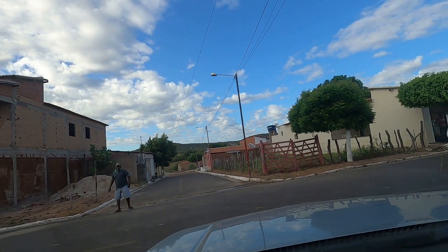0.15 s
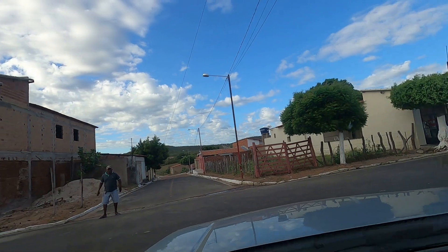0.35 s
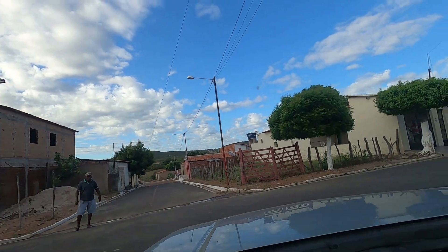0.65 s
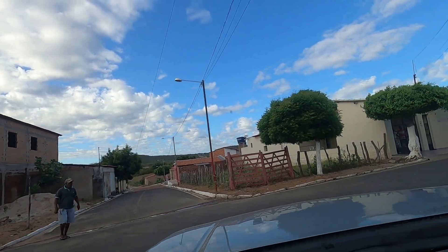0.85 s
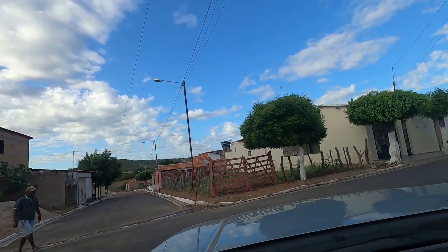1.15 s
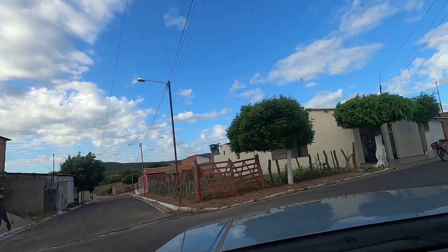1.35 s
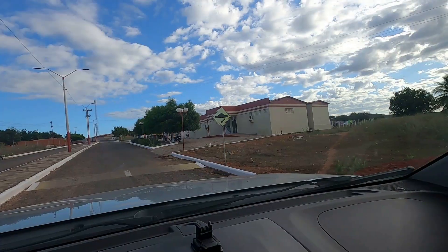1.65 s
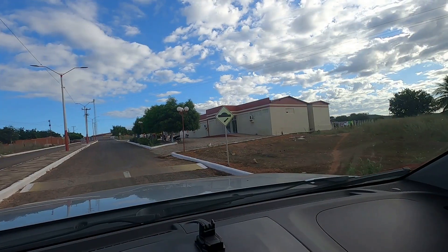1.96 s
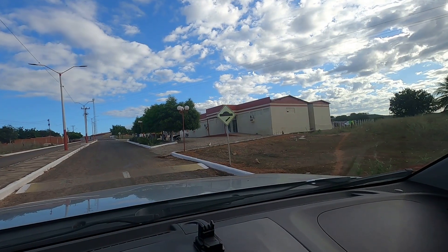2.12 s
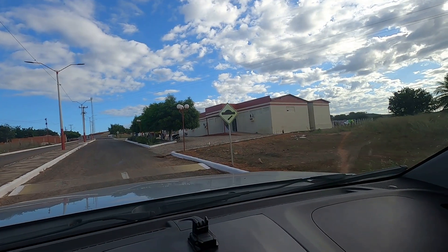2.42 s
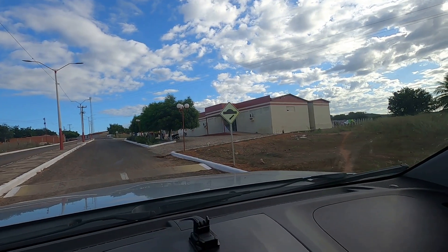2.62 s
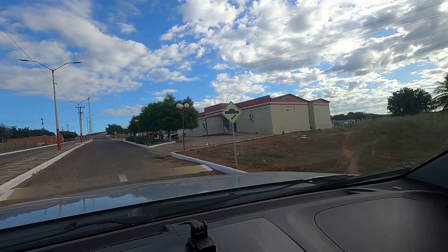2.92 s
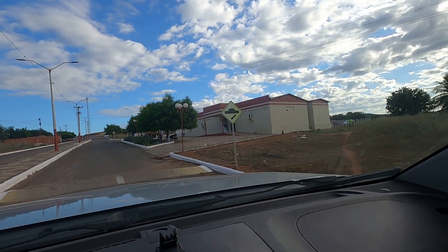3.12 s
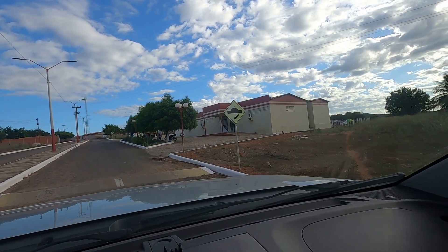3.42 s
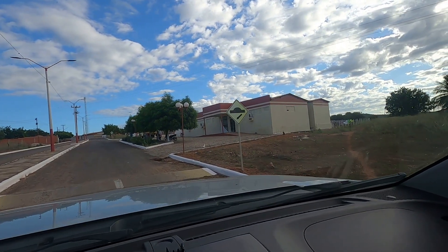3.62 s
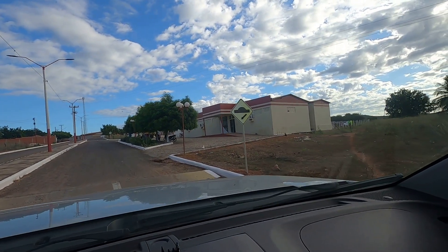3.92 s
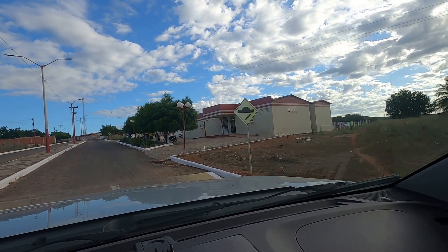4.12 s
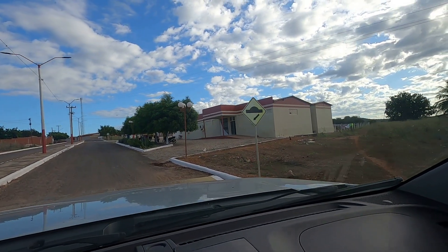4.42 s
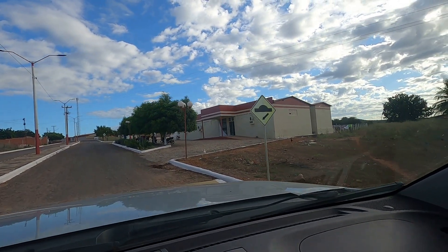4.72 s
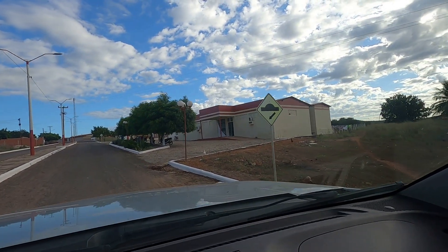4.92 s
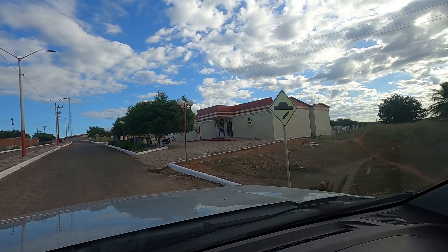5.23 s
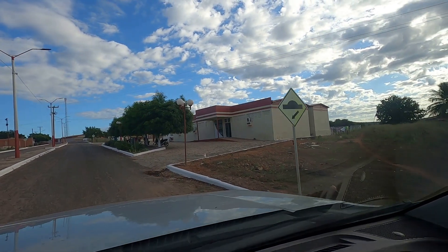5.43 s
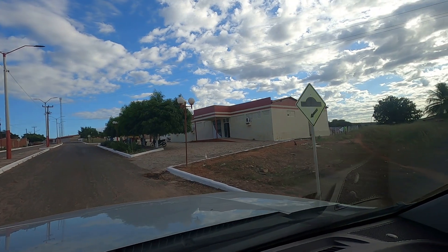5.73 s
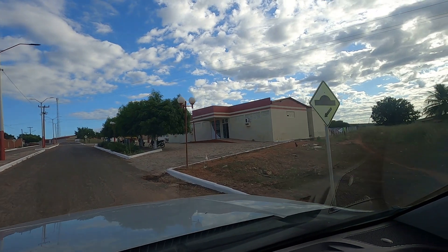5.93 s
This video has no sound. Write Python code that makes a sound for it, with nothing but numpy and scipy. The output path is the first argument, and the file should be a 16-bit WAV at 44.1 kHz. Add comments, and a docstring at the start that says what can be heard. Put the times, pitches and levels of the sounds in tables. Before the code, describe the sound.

Low-revving car engine and muffled tyre rumble heard from the cabin; loose trim clacks in a turn, sound cuts out, then driving resumes.

```python
"""First heard is a four-cylinder engine booming at low revs, from inside a car rolling slowly through town. The
tyres rumble through the body and drone in the panel resonances (filtered noise); in the turn a loose fitting
clicks and rattles (noise clacks and decaying modes), and road seams knock and ring. The sound of the turn
breaks off, a short silence follows, then the scene changes to a straight that fades in; late in it the road
noise changes colour and widens. The microphone is in the cabin, with two close ports, left and right."""
import sys
import numpy as np
from scipy import signal
from scipy.fft import rfft, irfft, next_fast_len
from scipy.io import wavfile

SR = 44100
rng = np.random.default_rng(int(sys.argv[2]) if len(sys.argv) > 2 else 0)


def dump(signal):
    """Clip the signal to [-1, 1] and save it as 16-bit WAV at the path in sys.argv[1]."""
    limited = np.clip(np.atleast_2d(signal).T, -1, 1)
    pcm = np.round(limited * 32767).astype(np.int16)
    wavfile.write(sys.argv[1], SR, pcm)


N = 267554
TIME = np.arange(N) / SR
FREQS = np.maximum(np.fft.rfftfreq(N, 1 / SR), 1)
LEFT_RIGHT = np.array([[1], [-1]])  # sign of the side signal at each port


def undb(db):
    """Decibels to gain."""
    return 10 ** (np.asarray(db) / 20)


def unit(x):
    """Scale to rms 1."""
    return x / np.sqrt(np.mean(x ** 2))


def curves(rows):
    """Each column of a table of (t, ..) rows, sample by sample."""
    t, *columns = np.transpose(rows)
    return [np.interp(TIME, t, column) for column in columns]


def swells(rows):
    """Sum of bell-shaped swells, one for each (t/s, level/dB, half length/s to 1/e)."""
    return sum(undb(db) * np.exp(-((TIME - s) / length) ** 2) for s, db, length in rows)


def colour(x, points, resonances=()):
    """Filter by a smooth spectrum with resonant humps or dips on top."""
    hz, db = np.transpose(points)
    gain_db = np.interp(np.log(FREQS), np.log(hz), db)
    for centre, width, lift in resonances:
        gain_db = gain_db + lift / (1 + (2 * (FREQS - centre) / width) ** 2)
    return irfft(rfft(x) * undb(gain_db), N)


def band(x, low_hz, high_hz, order=8):
    """Keep what lies between two edges, without phase shift."""
    low_cut = 1 + (low_hz / FREQS) ** (2 * order)
    high_cut = 1 + (FREQS / high_hz) ** (2 * order)
    return irfft(rfft(x) / np.sqrt(low_cut * high_cut), N)


def walk(rate):
    """Smooth chance of rms 1 that changes about rate times a second."""
    size = next_fast_len(N)
    smoothing = np.exp(-(np.fft.rfftfreq(size, 1 / SR) / rate) ** 2)
    return unit(irfft(rfft(rng.standard_normal(size)) * smoothing, size)[:N])


def narrow(hz, width_hz):
    """Noise in a narrow band around a centre that may move."""
    angle = 2 * np.pi * np.cumsum(hz * np.ones(N)) / SR
    return walk(width_hz) * np.sin(angle) + walk(width_hz) * np.cos(angle)


def diffuse(spread):
    """Noise at two close ports: alike in the bass, partly unrelated in the treble."""
    mid, side = rng.standard_normal((2, N))
    side = irfft(rfft(side) * (FREQS + 20) / (FREQS + 1400), N)
    return mid + spread * side * LEFT_RIGHT


# engine speed; it sags in the turn, picks up on the straight, then eases: (t/s, firing rate f/Hz)
REVS = [(0, 26.85), (.25, 25.09), (.5, 22.05), (1.08, 26.93), (1.3, 27.27), (1.58, 28.48), (1.92, 26.54),
        (2.55, 26.55), (2.82, 28.23), (3.15, 34.07), (3.55, 36.62), (4.04, 35.78), (4.27, 34.15),
        (4.66, 28.89), (4.98, 32.47), (5.5, 32.3), (6.05, 30.11)]


def firing_phase():
    """Phase of the firings in radians, summed from the engine speed."""
    hz, = curves(REVS)
    return 2 * np.pi * np.cumsum(hz) / SR


# the boom in the cabin in the turn, before a fixed lift: (t/s, level/dB)
BOOM_TURN = [(0, -27), (.45, -28), (.55, -40.5), (.7, -26.5), (.9, -27.5), (1.25, -19), (1.58, -19.5)]
# the boom in the cabin on the straight, before the same lift: (t/s, level/dB)
BOOM_STRAIGHT = [(2.1, -28.5), (2.25, -16.5), (2.47, -26.5), (2.78, -28), (2.88, -18.5), (3.02, -15.5),
                 (3.12, -25), (3.22, -17.5), (3.34, -16), (3.62, -21.5), (4.1, -16), (4.38, -18),
                 (4.55, -25.5), (4.66, -19), (4.82, -15), (5.0, -21.5), (5.1, -19), (5.4, -17.5),
                 (5.74, -27), (5.87, -20), (5.96, -23.5), (6.05, -19.5)]
# the boom's octave, strong while the engine pulls, before a fixed trim: (t/s, level/dB)
OCTAVE_PULL = [(0, -52.5), (.65, -24.5), (.95, -30), (2.5, -29.5), (2.73, -24), (2.999, -34), (3.699, -29),
               (3.92, -40), (4.3, -44.5), (4.75, -32.5), (4.95, -47), (5.6, -39.5), (6.05, -33)]
CUT_S = 1.594  # the sound of the turn breaks off here and the scene changes


def engine(phase):
    """Two firings a turn pump the cabin air; unequal cylinders add a weak line at the crank rate."""
    boom_db = np.where(TIME < CUT_S, curves(BOOM_TURN)[0], curves(BOOM_STRAIGHT)[0])
    octave_db, = curves(OCTAVE_PULL)
    boom = undb(boom_db) * (np.sin(phase) + undb(-31.0) * np.sin(phase / 2))
    octave = undb(octave_db + 1.0 * walk(2.4)) * np.sin(2 * phase + 1)
    third = undb(-57 + 6.5 * walk(4.3)) * np.sin(3 * phase)
    # the root of two makes each level that of an rms
    return np.sqrt(2) * (undb(1.38) * boom + undb(-0.2) * octave + third)


# spectrum of the body's boom: (f/Hz, level/dB per Hz)
BODY_BOOM = [(6, -24), (14, -2), (22, 2.5), (36, 0), (50, -7.5), (66, 4), (82, -0.5), (100, -13.5),
             (130, -22.5), (250, -54), (1000, -110)]


def heave(level_db, spread):
    """Uneven ground rocks the suspension and booms in the lowest cabin mode, nearly alike at both ports."""
    mid, side = rng.standard_normal((2, N))
    return unit(colour(mid + .22 * spread * side * LEFT_RIGHT, BODY_BOOM)) * undb(level_db)


# how hard the road shakes the tyres; it drives every layer of road(): (t/s, level/dB)
SHAKE = [(0, -3.5), (.2, -2.5), (.45, -1), (.65, 1), (1.1, 1), (1.57, -2.5), (1.95, -1), (2.12, 2.1),
         (2.32, .5), (2.5, -1), (2.95, -3.5), (3.15, -5.5), (3.55, -7), (3.9, -5.5), (4.2, -8), (4.9, -7.5),
         (5.35, -5.5), (6.05, -2.5)]
# tyre noise in the turn, on the straight and late on the straight: (f/Hz, level/dB per Hz)
COLOUR_TURN = [(80, 0.5), (180, -1), (240, -9.5), (360, -11.5), (460, -22), (820, -23.5), (1050, -20),
               (1400, -28.5), (1700, -38), (2600, -43.5), (4700, -47.5), (6000, -51.5), (9000, -60.5),
               (15000, -84)]
COLOUR_STRAIGHT = [(80, -3), (130, -4.5), (240, -9.5), (380, -15.5), (500, -21), (1000, -28), (1700, -31),
                   (2150, -40), (3000, -41), (4000, -44), (5200, -51), (7000, -61), (10000, -67),
                   (15000, -93)]
COLOUR_LATE = [(80, -6), (130, -5.5), (240, -10), (380, -14), (500, -26.5), (1000, -31), (1500, -30.5),
               (2000, -39.5), (3300, -42), (4300, -45.5), (5500, -50.5), (7500, -56.5), (10000, -70.5),
               (15000, -92.5)]
# cabin and panel resonances in the turn, on the straight and late on it: (f/Hz, width/Hz, lift/dB)
PANELS_TURN = [(169, 55, -3), (287, 45, 3), (366, 62, -0.5), (639, 80, 7), (1095, 82, 5), (1368, 43, 11.5),
               (3400, 1100, 5.5), (4600, 400, 6)]
PANELS_STRAIGHT = [(125, 44, 1.5), (206.6, 19, 5.6), (295, 36, 3.9), (384, 45, 2.4), (626, 120, 7),
                   (818, 120, 6.9), (1135, 150, 8.4), (1380, 120, 6.8), (1644, 88, 6.7), (2380, 42, 2),
                   (6000, 200, 4.5)]
PANELS_LATE = [(200.5, 34, 6.3), (287, 51, 3.2), (644, 710, 5), (780, 490, 5.8), (1180, 150, 2.1),
               (1370, 120, 4.1), (2870, 150, 3.2)]
# rows for body boom, rumble, panel drone, tyre hiss: (level/dB at a shake of 0 dB, slope/dB per dB of shake)
LEVELS_TURN = [(-30.5, 1.3), (-34, 0.83), (-43.5, 0.6), (-57, 0.64)]
LEVELS_STRAIGHT = [(-27.5, 1.2), (-33.5, 0.57), (-44, 1.064), (-54, 0.9)]
LEVELS_LATE = [(-28.5, 1.15), (-30, 1.37), (-43.5, 1.06), (-59, 0.33)]


def road(levels, points, panels, phase, spread):
    """Tyres rock the body and shake its panels, each layer in step with the shake."""
    shake_db, = curves(SHAKE)
    body_db, rumble_db, drone_db, hiss_db = (db + slope * shake_db for db, slope in levels)
    noise = colour(diffuse(spread), points, panels)
    # each layer is scaled by the spread of a reference band of the same noise
    rumble = band(noise, 72, 442) / np.std(band(noise, 119.6, 440))
    rumble = rumble * undb(rumble_db + 1.0 * walk(25))
    drone = band(noise, 446, 1720) / np.std(band(noise, 552.5, 2300))
    drone = drone * undb(drone_db + 0.86 * walk(4.3))
    hiss = band(noise, 1864, 16000) / np.std(band(noise, 1877, 9000))
    hiss = hiss * undb(hiss_db + 0.72 * walk(17))
    throb = 1 + 0.084 * np.sin(phase)  # the upper noise throbs slightly with the firings
    return heave(body_db, spread) + rumble + (drone + hiss) * throb


# jolts from the road: (t/s, panel ring level/dB, panel ring f/Hz, knock level/dB)
JOLTS = [(0.294, -30.5, 308, -41), (.724, -19, 163, -48.5), (0.762, -16, 173, -43), (.795, -23, 190, -54),
         (0.857, -16.5, 157, -57), (1.389, -20.5, 262, -35.5), (1.397, -25, 493, -41.5),
         (1.408, -23, 380, -36), (1.443, -17, 149, -46), (2.064, -17.5, 151, -43), (2.169, -25, 240, -46),
         (2.206, -23.5, 379, -39), (2.292, -29, 520, -30), (2.313, -20, 218, -47), (2.326, -18.5, 270, -28),
         (2.337, -27, 391, -47), (2.391, -22, 136, -50)]
# spectrum of the knock through the body: (f/Hz, level/dB per Hz)
KNOCK = [(150, -0.5), (500, 3), (850, -8.5), (1250, -3), (1800, -11.5), (3500, -22.5), (5600, -28.5),
         (8000, -45.5), (14000, -69)]
# the body shudders over rough patches: (t/s, level/dB, half length/s)
SHUDDERS = [(.79, -33, 0.12), (1.42, -31, 0.068), (1.86, -31, 0.026), (2.17, -41, 0.086), (2.32, -36, 0.02)]
# spectrum of the shudder: (f/Hz, level/dB per Hz)
SHUDDER_COLOUR = [(30, -25), (90, 3), (170, 3.5), (330, -4.5), (500, -20), (1500, -44), (12000, -93.5)]
JOLT_ATTACK_S, PANEL_T60_S, KNOCK_T60_S = 0.0028, 0.077, 0.078


def jolts():
    """A wheel meets a seam: a short knock and a low panel ring; on rough patches the whole body shudders."""
    out = unit(colour(rng.standard_normal(N), SHUDDER_COLOUR)) * swells(SHUDDERS)
    thud = unit(colour(rng.standard_normal(N), KNOCK))
    t = TIME[:SR // 4]
    attack = 1 - np.exp(-t / JOLT_ATTACK_S)
    for s, ring_db, ring_hz, knock_db in JOLTS:
        at = slice(int(s * SR), int(s * SR) + len(t))
        ring = np.sin(2 * np.pi * ring_hz * t) * undb(ring_db - 60 * t / PANEL_T60_S)
        knock = thud[at] * undb(knock_db - 60 * t / KNOCK_T60_S)
        out[at] += attack * (ring + knock)
    return out


# knocks of loose fitting and trim, before the trims and limits in rattles():
# (t/s, level/dB, treble relative to it/dB, ring of the struck part f/Hz, that ring relative to the clack/dB)
RATTLES = [(0.2876, -25, -10, 3510, -5), (0.2957, -35.5, 2, 7420, -3), (0.2979, -19.5, 1, 4280, -8),
           (0.3, -10.5, -1, 4250, -6), (0.3033, -19.5, -6, 4680, -3), (0.3095, -30, -17, 4140, -3),
           (.3786, -48, -6, 7600, -2), (.635, -44, -13, 4170, -3), (0.685, -37, -22, 2840, 2),
           (.691, -38.5, -20, 3850, 2.5), (0.7618, -45, -21, 2810, 4), (.805, -47, -8, 5600, -3),
           (0.9862, -41, -17, 3800, -3), (1.045, -47, -2.5, 7800, -5), (1.05, -38, -10, 3830, 6),
           (1.128, -41, -12, 4800, -4), (1.143, -40, -16, 4680, -3), (1.181, -30, -22, 4860, -2),
           (1.184, -34, -23.5, 3670, -4.5), (1.365, -48, -3.5, 4400, -2.5), (1.3843, -39, -8, 2590, 1.5),
           (1.3875, -29, -16.5, 5600, -7), (1.3902, -25, -13, 2400, -3), (1.3922, -27, -20, 3530, -3),
           (1.4288, -37.5, -21, 3880, -2), (1.432, -39.5, -18.5, 2860, 1), (1.965, -48, -10, 2440, 8),
           (2.014, -54, -16, 2040, 2), (2.293, -49, -17, 2340, -3), (2.296, -48, -22, 2430, 4),
           (2.327, -54, -16, 5350, 0), (2.505, -56, -8, 5770, -1), (2.893, -58, -9, 7200, 0),
           (4.45, -55.5, 0, 7280, -5), (4.739, -48.5, -15, 2050, 0), (4.99, -56, -11, 6344, 0),
           (5.129, -57, -16, 5400, -4)]
# modes of the loose fitting: (f/Hz, level/dB, t60/s, left minus right/dB)
FITTING = [(2330, -14, .07, 8), (2751, -17, .07, 4), (3598, -4, .07, 4), (3736, -3, .065, 0),
           (3904, -7, .06, 0), (3999, 0, .065, 0), (4120, -3, .03, 0), (4252, -1.5, .08, 4),
           (4332, 0, .08, -5), (4424, -4, .08, 1), (4540, -3, .03, 4), (4667, -4, .07, 5),
           (4724, -3, .07, 6), (4850, -11, .04, 4), (5012, -12, .06, 4), (5308, -16, .07, -7),
           (5612, -16, .08, -3), (6700, -16, .045, -6), (7402, -17, .045, -4), (7742, -13, .07, -6),
           (8700, -15, .04, 4)]
# spectrum of the dashboard's own clack: (f/Hz, level/dB per Hz)
CLACK = [(500, -10), (1400, -3), (2400, -1.5), (3200, 0.5), (4200, 1), (6000, -5.5), (8500, -12.5),
         (11000, -24.5), (15000, -40)]


def rattles():
    """Each knock clacks on the dashboard and dies in the small cabin; hard ones make the fitting ring."""
    out = np.zeros((2, N))
    t = TIME[:SR // 4]
    # every knock takes the same echo paths through the cabin: one stretch of noise serves them all
    clack = unit(colour(diffuse(0.61), CLACK, [(7900, 90, 9.0)]))
    treble = band(clack, 6300, 16000, order=4)
    tail = undb(-60 * t / 0.019) + 0.39 * undb(-60 * t / 0.094)  # two decays, t60 in s
    attack = 1 - np.exp(-t / 0.0004)
    for s, db, treble_db, part_hz, part_db in RATTLES:
        at = slice(int(s * SR), int(s * SR) + len(t))
        # the modes start with scattered phases; each reaches the two ports with its own phase and level
        shared_phases = 1.7 * rng.standard_normal((len(FITTING), 1, 1))
        port_phases = 0.77 * rng.standard_normal((len(FITTING), 2, 1))
        fitting = 0
        for (hz, mode_db, t60, pan_db), phase in zip(FITTING, shared_phases + port_phases):
            envelope = undb(mode_db + pan_db * LEFT_RIGHT / 2 - 60 * t / t60)
            fitting = fitting + envelope * np.sin(2 * np.pi * hz * t + phase)
        part = np.sin(2 * np.pi * part_hz * t) * undb(part_db - 60 * t / 0.058)
        hardness = np.clip(undb(db + 18), .3, 1)
        bright = undb(np.clip(treble_db + 13.0, -8, 10))
        knock = (clack + (bright - 1) * treble)[:, :len(t)] * tail
        mix = 0.41 * hardness * fitting + (1 - 0.78 * hardness) * (knock + part)
        out[:, at] += undb(db - 6.0) * attack * mix
    return out


# body panels hum briefly: (t/s, level/dB, half length/s, f/Hz)
HUMS = [(0.142, -38, 0.047, 148.2), (0.958, -30.5, 0.035, 200), (1.022, -35.5, 0.11, 319.8),
        (1.333, -39, 0.11, 300), (2.75, -36.5, .2, 124.9), (2.618, -39, 0.087, 265),
        (3.174, -39, 0.082, 227.8), (4.525, -41, 0.1, 130.2), (5.21, -38.5, .06, 259.5),
        (5.55, -38.5, .22, 135), (5.745, -39.5, 0.18, 199.2)]
HUM_WIDTH_HZ = 15.2


def hums():
    """Ripples in the road set one panel after another humming."""
    return sum(narrow(hz, HUM_WIDTH_HZ) * swells([(s, db, length)]) for s, db, length, hz in HUMS)


# bursts of trim chattering in a dense buzz: (t/s, level/dB, half length/s)
CHATTER = [(.6, -59.5, 0.16), (.765, -56, 0.056), (1.07, -62, 0.098)]


def chatter():
    """Tiny dense taps of plastic trim blur into a fizz: noise with a fast uneven level."""
    taps = diffuse(0.73) * undb(2.1 * walk(150))
    # f/Hz, level/dB per Hz
    trim = [(1000, -28.5), (3500, 5.5), (6000, -1.0), (7900, -5.0), (10000, -13.5), (15000, -19.5)]
    return unit(colour(taps, trim, [(7870, 300, 4.9)])) * swells(CHATTER)


# swishes in the hiss: (t/s, level/dB, half length/s, centre f/Hz, glide/octaves per s, width/Hz)
SWISHES = [(2.2, -57, 0.22, 2595, -0.44, 600), (3.875, -68.5, .09, 4400, -1.2, 685),
           (4.721, -66.5, .12, 2700, 0, 890), (5.138, -64, .08, 2170, 1, 400),
           (5.438, -64, .2, 3580, 1.8, 1000)]


def swishes():
    """A narrow band of hiss swells and fades, its centre gliding where the table says so."""
    out = 0
    for s, db, length, centre_hz, glide, width_hz in SWISHES:
        hz = centre_hz * 2 ** (glide * np.clip(TIME - s, -2 * length, 2 * length))
        out = out + narrow(hz, width_hz) * swells([(s, db, length)])
    return out


# colour of the microphone's left port in the turn: (f/Hz, level/dB)
LEFT_PORT = [(30, 1.2), (60, 0.5), (250, 0), (500, -0.5), (1000, 0), (2400, 3.5), (4400, 2.5), (7400, -6.5),
             (9000, -1.5), (11000, -4.5)]


def ports(x):
    """The left port is a sample (8 mm of air) further off, has its own colour, and leads in the deep bass."""
    bass_lead = signal.butter(1, 5, "high", fs=SR, output="sos")
    left = signal.sosfilt(bass_lead, colour(x[0], LEFT_PORT))
    return np.array([np.roll(left, shift=1), x[1]])


# share of the late road noise on the straight: (t/s, share 0-1)
LATE_SHARE = [(4.85, 0), (5.35, 1)]
RESUME_S, FADE_S = 1.7844, 0.13  # the straight's start and the length of its fade-in


def scene():
    """The sound of the turn breaks off and the scene changes: the straight fades in, its road noise near mono,
    then changing colour and widening."""
    phase = firing_phase()
    late_share, = curves(LATE_SHARE)
    car = engine(phase) + jolts() + rattles() + hums() + chatter() + swishes()
    turn = ports(car + road(LEVELS_TURN, COLOUR_TURN, PANELS_TURN, phase, spread=0.68))
    early = road(LEVELS_STRAIGHT, COLOUR_STRAIGHT, PANELS_STRAIGHT, phase, spread=.003)
    late = road(LEVELS_LATE, COLOUR_LATE, PANELS_LATE, phase, spread=0.28)
    straight = car + np.sqrt(1 - late_share) * early + np.sqrt(late_share) * late
    fade_in = np.clip((TIME - RESUME_S) / FADE_S, 0, 1) ** 2
    return turn * (TIME < CUT_S) + straight * fade_in


TOP_HZ = 15700


def record(dry):
    """The recorder cuts the top with a steep low-pass."""
    return signal.sosfilt(signal.ellip(8, .2, 70, TOP_HZ, fs=SR, output="sos"), dry)


dry = scene()
out = record(dry)
dump(out)
```